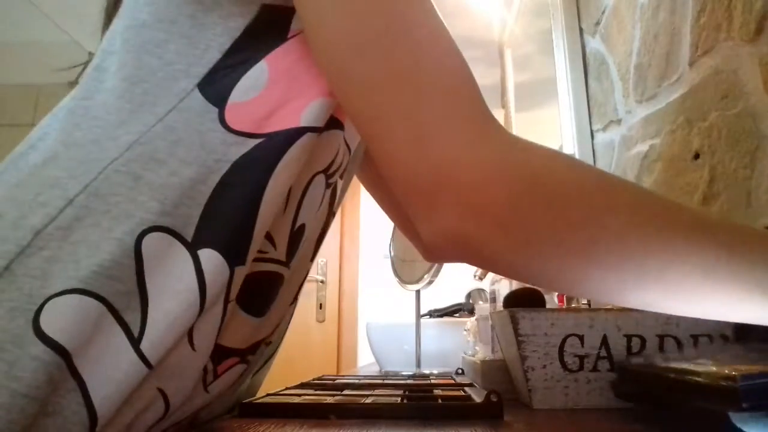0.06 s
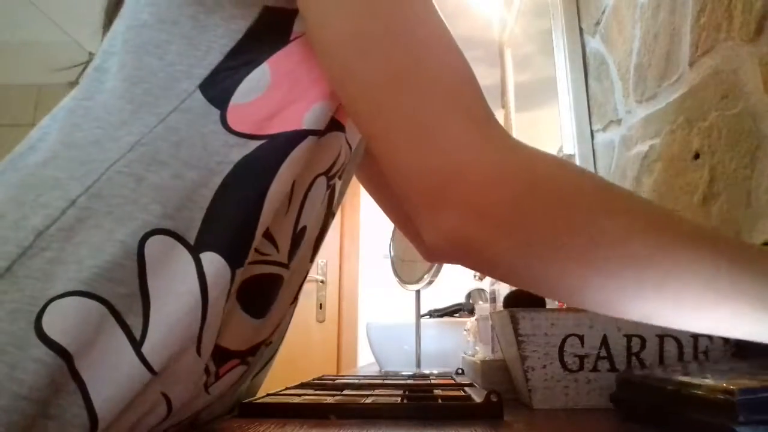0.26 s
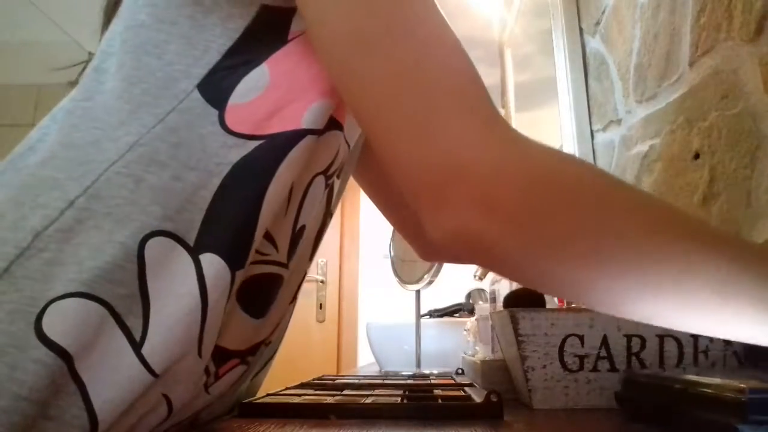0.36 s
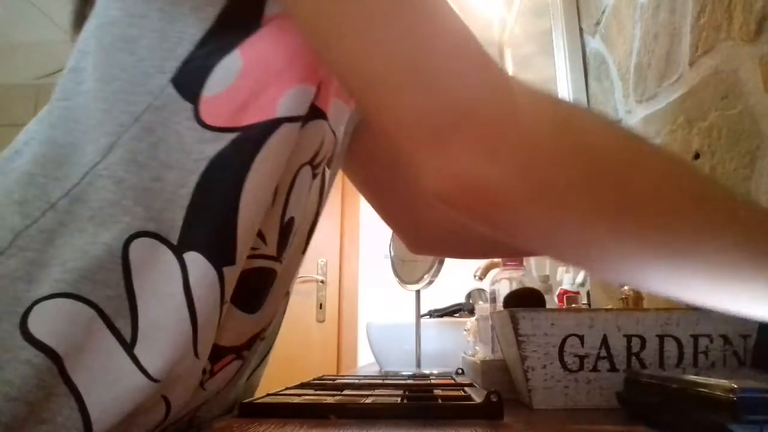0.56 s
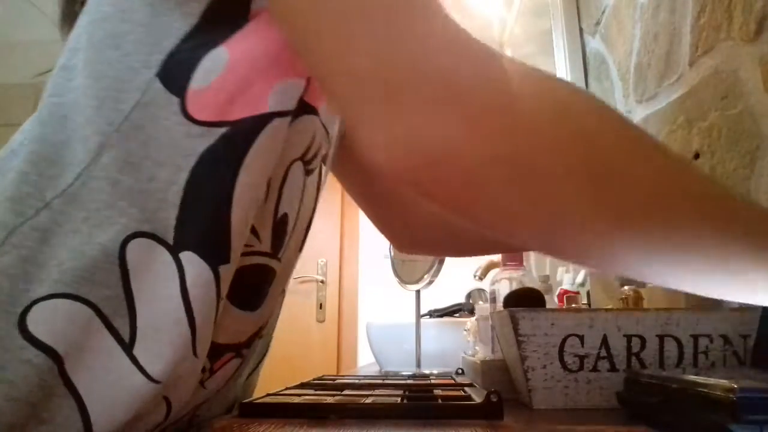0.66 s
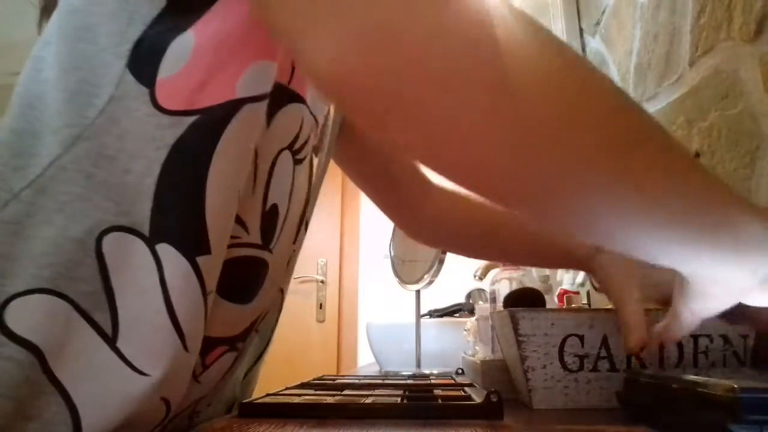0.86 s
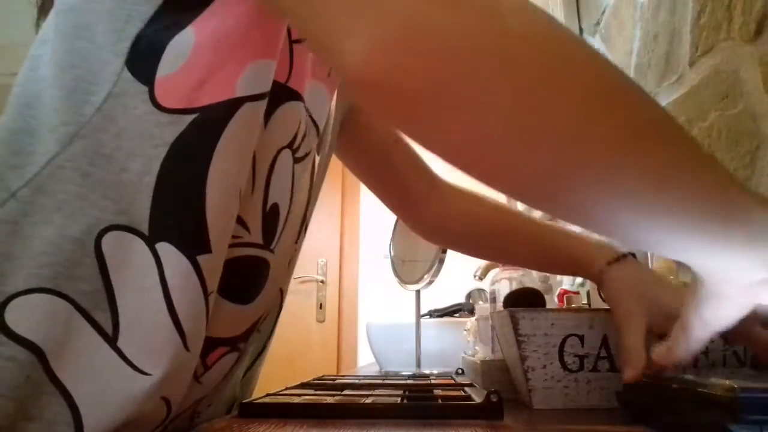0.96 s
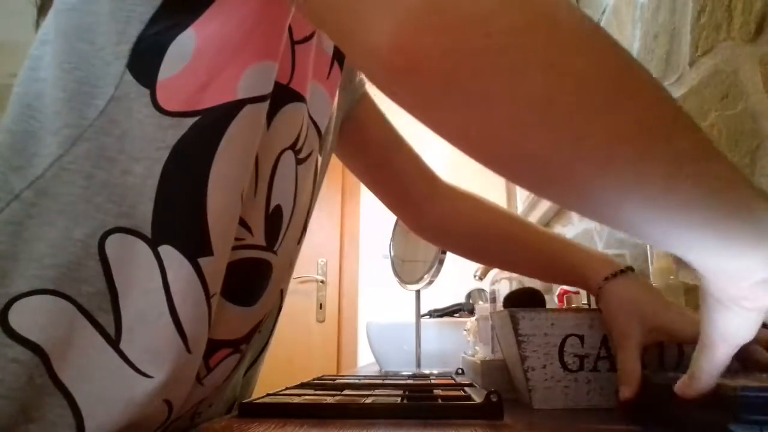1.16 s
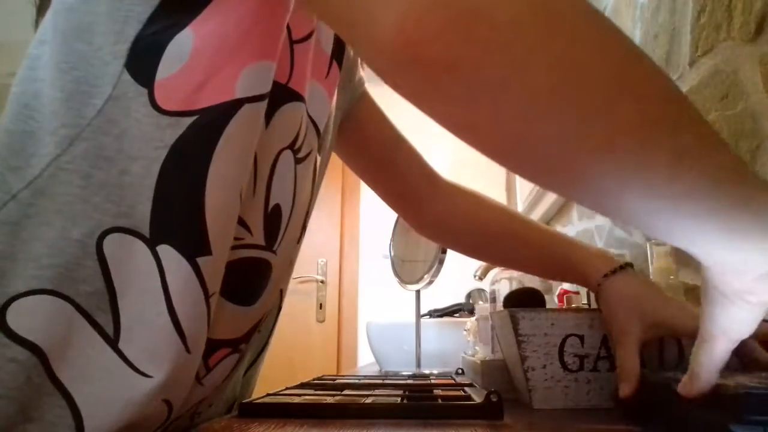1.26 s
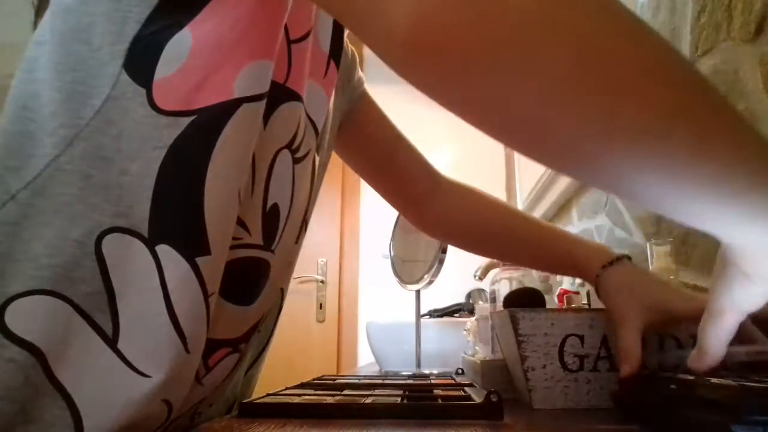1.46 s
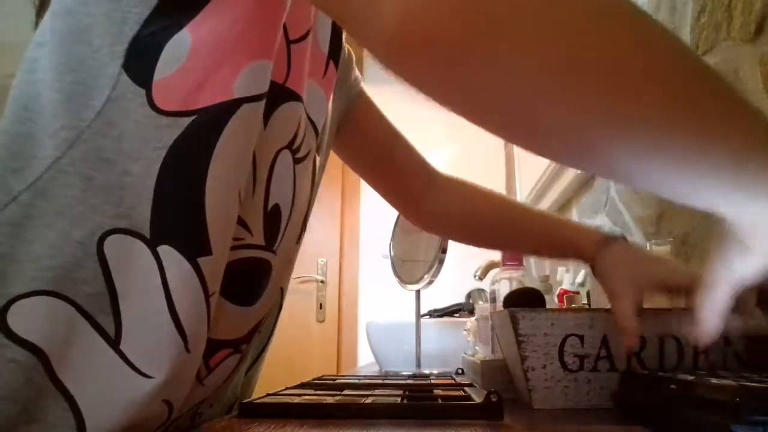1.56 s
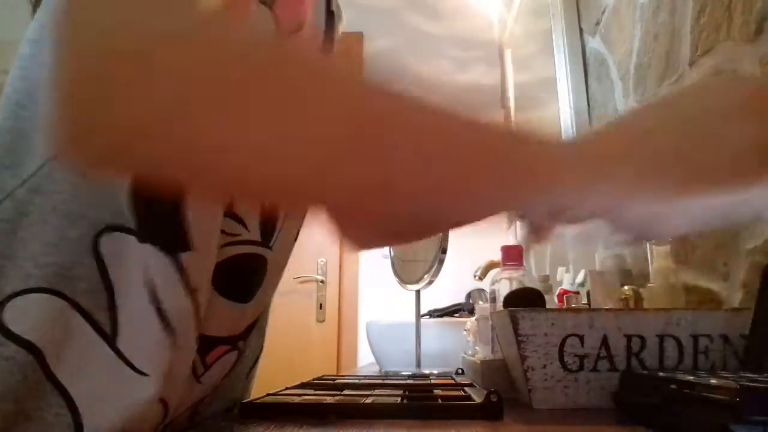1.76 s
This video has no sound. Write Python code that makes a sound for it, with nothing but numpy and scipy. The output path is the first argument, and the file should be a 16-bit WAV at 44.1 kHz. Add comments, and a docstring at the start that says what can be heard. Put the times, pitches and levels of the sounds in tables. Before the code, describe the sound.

Plastic makeup palettes clack sharply together on a wooden table, then click and slide faintly indoors

```python
"""Plastic palettes are set down, knocked together and slid on a wooden table in a hard-walled room.
Each contact rings the case, its edges and a sharp crack; some blows also make the table top hum.
Slides are dense tiny catches, and light taps ring a hollow lid. The room adds a tail of about half
a second, longer in the bass. A small dull microphone hears it nearly in mono, with faint hiss."""
import sys
import numpy as np
from scipy import signal
from scipy.fft import rfft, irfft
from scipy.io import wavfile

SR = 44100
rng = np.random.default_rng(int(sys.argv[2]) if len(sys.argv) > 2 else 0)


def pcm_store(signal):
    """Save signal as 16-bit PCM."""
    levels = np.round(np.clip(np.atleast_2d(signal), -1, 1) * 32767)
    wavfile.write(sys.argv[1], SR, levels.astype(np.int16).T)


def invert_db(level):
    """Linear amplitude ratio for a level in decibels (20 dB per decade), elementwise."""
    return 10 ** (np.asarray(level, dtype=float) / 20)


N = 79380  # samples, 1.8 s


def evened(x):
    """Scales a sound to an average strength (rms) of 1."""
    return x / np.sqrt(np.mean(x ** 2) + 1e-20)


def read(points, hz):
    """Reads a table between its points, along log frequency."""
    point_hz, value = np.transpose(points)
    return np.interp(np.log(hz + 1), np.log(point_hz + 1), value)


def add(mix, s, sound):
    """Mixes a sound in at time s, in seconds."""
    part = mix[max(round(s * SR), 0):][:len(sound)]
    part += sound[:len(part)]


def coloured(x, spectrum):
    """Shapes a sound's spectrum by a table of Hz and dB."""
    n = x.shape[-1]
    gain = invert_db(read(spectrum, np.fft.rfftfreq(n, 1 / SR)))
    return irfft(rfft(x) * gain, n)


def soften(x):
    """The case, edges and slides give little treble, so a low-pass takes it away."""
    return signal.sosfilt(signal.butter(6, 4750, fs=SR, output="sos"), x)


def slide(length_s, level_db, hz):
    """Dense tiny catches excite one narrow resonance and a wide band, under one smooth stroke."""
    catches_per_s, wide_db = 2500, -6.5  # wide band relative to the narrow one
    width, skew = 0.12, 0.7  # relative half-width; a skew below 1 makes the stroke peak early
    n = round(length_s * SR)
    grit = (rng.random(8192) < catches_per_s / SR) * rng.standard_normal(8192)
    grit = np.resize(grit, n)  # a longer slide repeats the same grit
    narrow = signal.butter(2, [hz * (1 - width), hz * (1 + width)], "bandpass", fs=SR, output="sos")
    wide = signal.butter(3, [500, 4600], "bandpass", fs=SR, output="sos")
    sound = evened(signal.sosfilt(narrow, grit))
    sound = sound + invert_db(wide_db) * evened(signal.sosfilt(wide, grit))
    stroke = np.sin(np.pi * np.linspace(0, 1, n) ** skew)
    return invert_db(level_db) * soften(sound) * stroke


def room_tone():
    """The quiet background of the room is steady noise, strongest in the low and middle range."""
    # Colour of the background. Each row: frequency in Hz, relative level in dB per Hz.
    air = [(40, -37), (62, -13.5), (85, 7), (115, -4.5), (170, 0), (300, -1.5), (600, 2), (1500, -1),
           (3000, -8.5), (4300, -10.5), (5200, -26), (9000, -40.5)]
    return invert_db(-71.5) * evened(coloured(rng.standard_normal(N), air))


def microphone_hiss():
    """The microphone's own noise is drawn separately for each channel."""
    # Colour of the hiss. Each row: frequency in Hz, relative level in dB per Hz.
    hiss = [(25, 0.5), (200, 3.5), (1000, 6), (3000, 7), (5000, -5), (8000, -5.5), (9500, -7), (10100, -20),
            (10700, -3.5), (12500, -5), (14500, -5), (15100, -9), (15600, -13.5)]
    return invert_db(-69) * evened(coloured(rng.standard_normal((2, N)), hiss))


def room_tail():
    """Sparse reflections of random sign build up quickly, then each band dies at its own speed."""
    # How long the room rings. Each row: frequency in Hz, time to fall by 60 dB in seconds.
    decay = [(100, 0.99), (260, 0.89), (700, 0.48), (1840, 0.47), (4850, 0.44), (9000, 0.69), (14000, 0.23)]
    # How the walls colour the tail. Each row: frequency in Hz, relative level in dB.
    colour = [(80, 4.5), (300, 4.5), (800, 9), (1500, -5.5), (3000, -1), (4500, -7.5), (6000, -10),
              (12000, 4)]
    build_s = 0.004
    reflections = np.zeros(SR)
    at = np.arange(100, SR - 20, 20)  # one reflection in every 20 samples
    reflections[at + rng.integers(0, 20, len(at))] = rng.choice([-1., 1.], len(at))
    reflections *= 1 - np.exp(-np.arange(SR) / SR / build_s)
    hz, t, bands = signal.stft(reflections, SR, nperseg=512)
    fall_db = 60 * t / read(decay, hz)[:, None]
    bands = bands * invert_db(read(colour, hz)[:, None] - fall_db)
    tail = signal.istft(bands, SR, nperseg=512)[1]
    return tail / np.linalg.norm(tail)


def ring(modes, t, vary=1):
    """One strike sets off fading tones, neighbours in opposite phase, a little different each time."""
    detune, spread_db = 0.02, 1.2  # typical differences between strikes, both scaled by vary
    rise_cycles = 0.36  # soft start
    hz, db, t60 = np.transpose(modes)[:, :, None]
    pitch_draw, level_draw = vary * rng.standard_normal((2, len(modes), 1))
    hz = hz * (1 + detune * pitch_draw)
    rise = (1 - np.exp(-t * hz / rise_cycles)) ** 2
    sign = (-1.) ** np.arange(len(modes))[:, None]
    fade = invert_db(db + spread_db * level_draw - 60 * t / t60)
    return (sign * rise * fade * np.sin(2 * np.pi * hz * t)).sum(0)


def contact(case_db, edge_db, crack_db, focus_hz):
    """A blow, then the brief chatter of loose pans, rings the case, its thin edges and a crack."""
    # Tones of the case, its thin edges and the sharp crack. Each row: frequency in Hz before detuning,
    # level in dB before the strike's variation (and, for the case, before the focus),
    # time to fall by 60 dB in seconds.
    case = [(800, -2, .012), (1080, 0, .013), (1350, 0, .014), (1640, 0, .012), (1980, 0, .012)]
    edge = [(2405, 3.5, 0.0068), (3086, -2, 0.0061), (3407, 0.56, .009), (3890, -0.69, 0.0073),
            (4327, 2, 0.0077)]
    crack = [(5100, 0, .006), (5900, -4, .005), (7000, -5, .005), (8600, -14, .003), (11200, -22, .002),
             (12800, -21, .002), (14500, -24, .002)]
    # Gains added to every contact: case, edge, crack, all in dB.
    gains_db = [0, -0.5, 3.5]
    chatter_s, chatter_per_s, chatter_db = 0.003, 3000, -9  # fade time, density, level against the blow
    focus_db_per_octave = -14  # case tones away from the focus ring less
    t = np.arange(2000) / SR
    chatter = (rng.random(len(t)) < chatter_per_s / SR) * rng.standard_normal(len(t))
    chatter = chatter * np.exp(-t / chatter_s) * invert_db(chatter_db)
    chatter[0] = 1  # the blow itself
    chatter = chatter / np.linalg.norm(chatter)
    focused = [(hz, db + focus_db_per_octave * abs(np.log2(hz / focus_hz)), t60)
               for hz, db, t60 in case]
    body = invert_db(case_db + gains_db[0]) * ring(focused, t)
    body = body + invert_db(edge_db + gains_db[1]) * ring(edge, t)
    sharp = invert_db(crack_db + gains_db[2]) * ring(crack, t)
    return signal.fftconvolve(soften(body) + sharp, chatter)


def knock(*levels_db):
    """The table top hums after a blow, in deep, middle and upper groups of tones."""
    # Tones of the table top, in three groups from deep to upper. Each row: frequency in Hz and level
    # in dB, both before the strike's small variation, time to fall by 60 dB in seconds.
    table_top = [
        [(90.5, -2.6, 0.2), (127.3, -3.6, 0.19), (190.6, -2.5, 0.17)],
        [(267.9, -5.3, 0.15), (522.6, 2, 0.055)],
        [(330.4, 1, 0.037), (465.4, 5.5, 0.06), (656.3, 11, 0.027)],
    ]
    t = np.arange(SR // 2) / SR
    return sum(invert_db(db) * ring(modes, t, vary=0.067) for db, modes in zip(levels_db, table_top))


def tap(level_db):
    """A light tap rings a hollow lid."""
    # Tones of the lid. Each row: frequency in Hz and level in dB, both before the strike's variation,
    # time to fall by 60 dB in seconds.
    lid = [(1285, -3.5, 0.024), (1600, -4.5, 0.026), (2110, -13, .008), (2740, -11, 0.013)]
    return invert_db(level_db) * ring(lid, np.arange(2000) / SR)


def scene():
    """Sounds take turns among four spots on the table, each with its own path through the room."""
    # Contacts. Each row: start in seconds, case, edge and crack levels in dB before the fixed gains,
    # share sent to the room in dB, where the case rings most in Hz.
    hits = [(.003, -36, -42.5, -55.5, 6, 1510), (.0685, -52, -45.5, -66, 11, 1350),
            (.1072, -49, -46.5, -68, -1, 1900), (.2012, -17, -9, -28, -2.5, 1820),
            (.2030, -15, -22.5, -46, 2, 1940), (.2055, -7, -17, -57.5, 1, 1356),
            (.229, -17.5, -35, -61.5, 1, 1570), (.240, -21.5, -31, -49, 1, 1420),
            (.261, -20.5, -34, -49.5, -9.5, 1670), (.316, -26, -33, -47.5, 4, 1280),
            (.430, -33, -34, -41.5, -7, 1500), (0.4323, -24, -28, -48, 5, 1490),
            (.435, -28.5, -25.5, -42, 4.5, 1500), (.4558, -20, -15.5, -43, 2.5, 1800),
            (.4595, -11.5, -17, -35.5, 1.5, 1620), (.465, -14, -22, -37, -6, 1270),
            (.474, -11, -39, -49, -0.5, 1190), (.496, -28, -45, -38.5, -0.5, 1220),
            (.500, -28, -24, -47, -9, 1320), (.783, -46, -59, -79, -3, 990),
            (1.076, -66.5, -57.5, -87.5, 10, 1300), (1.0925, -54.5, -51, -87.5, -7, 1600),
            (1.208, -49, -52, -78.5, 7.5, 1500), (1.243, -40.5, -49.5, -74.5, -5.5, 1296),
            (1.2866, -38, -39, -57, -1, 1270), (1.298, -34.5, -55, -71, -10, 940),
            (1.317, -54, -58, -75, -9, 900), (1.331, -44, -63.5, -75, -4.5, 892),
            (1.572, -44, -54.5, -74, -1, 1300), (1.643, -76.5, -64, -82, -13.5, 1315),
            (1.757, -73, -65, -80.5, -6.5, 1295)]
    # Knocks carried into the table top. Each row: start in seconds, then the levels of
    # the deep, middle and upper tones in dB.
    knocks = [(.003, -67, -57, -64.5), (0.067, -62.5, -74.5, -60.5), (0.106, -64, -80, -59.5),
              (.203, -52.5, -52, -36), (.435, -63, -46.5, -49.5), (.460, -49, -44.5, -38.5),
              (.496, -52.5, -62, -47), (.830, -65, -48.5, -69.5), (1.246, -70, -68, -64),
              (1.288, -64.5, -57.5, -69.5), (1.574, -78, -77, -72)]
    # Light taps on the lid. Each row: start in seconds, level in dB, share sent to the room in dB.
    taps = [(0.0667, -42.5, -2.5), (0.082, -44, -3), (0.1084, -37.5, -3.5), (0.111, -39, -6.5),
            (0.124, -44.5, 1), (0.135, -46.5, -2), (.818, -39, -12), (0.825, -29, -7.5)]
    # Slides. Each row: start in seconds, length in seconds, level in dB before the wide band,
    # softening and stroke, pitch of the scrape in Hz.
    slides = [(0, 0.093, -61, 2530), (.06, 0.079, -53.5, 1256), (.755, 0.057, -56, 1490),
              (0.775, .016, -52.5, 1930), (.755, 0.067, -62, 3960), (1.07, 0.12, -72.5, 3780),
              (1.085, 0.082, -71.5, 2000), (1.19, 0.3, -69.5, 3950), (1.209, 0.25, -69, 2000),
              (1.29, 0.03, -75.5, 972), (1.58, .07, -71, 2587), (1.549, 0.042, -77, 810)]
    knock_wet_db = -7  # share of every knock sent to the room
    sounds = [(s, contact(*levels, hz), wet_db) for s, *levels, wet_db, hz in hits]
    sounds += [(s, knock(*levels), knock_wet_db) for s, *levels in knocks]
    sounds += [(s, tap(db), wet_db) for s, db, wet_db in taps]
    sounds += [(s, slide(*row), 0) for s, *row in slides]
    direct, spots = np.zeros(N), np.zeros((4, N))
    for k, (s, sound, wet_db) in enumerate(sounds):
        add(direct, s, sound)
        add(spots[k % 4], s, invert_db(wet_db) * sound)
    wet = sum(signal.fftconvolve(spot, room_tail())[:N] for spot in spots)
    mid = direct + wet + room_tone()
    return np.array([mid, mid])


def top_cut(x):
    """Nothing passes above the cut-off."""
    return signal.sosfilt(signal.butter(12, 16160, fs=SR, output="sos"), x)


def record(dry):
    """The microphone cuts the deep bass, adds hiss in each channel and a small constant offset."""
    bass_cut = signal.butter(3, 70, "highpass", fs=SR, output="sos")
    offset = -0.0005  # of full scale
    mix = signal.sosfilt(bass_cut, dry) + microphone_hiss() + offset
    return top_cut(mix)


dry = scene()
out = record(dry)
pcm_store(out)
```